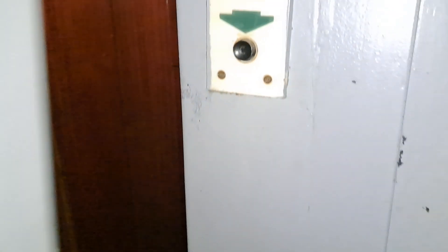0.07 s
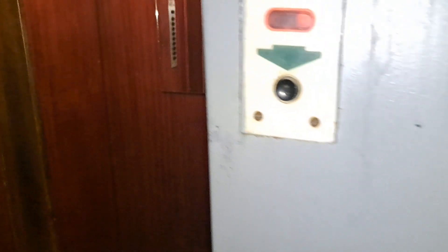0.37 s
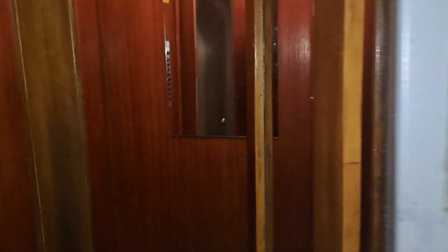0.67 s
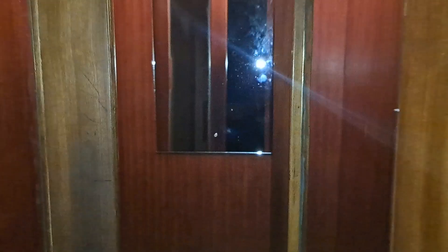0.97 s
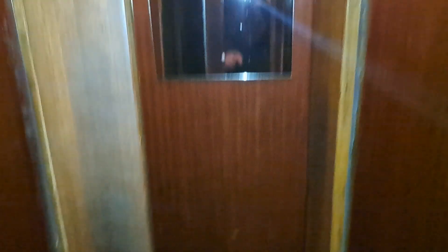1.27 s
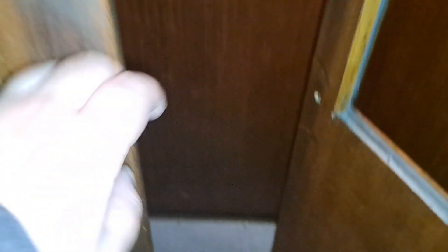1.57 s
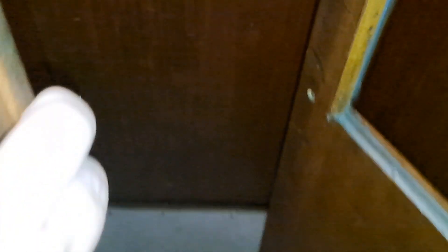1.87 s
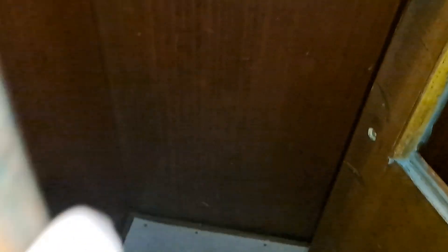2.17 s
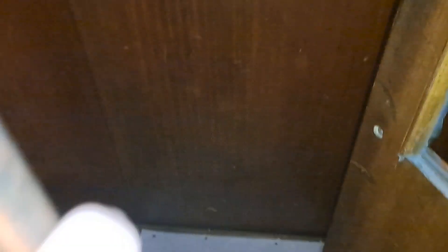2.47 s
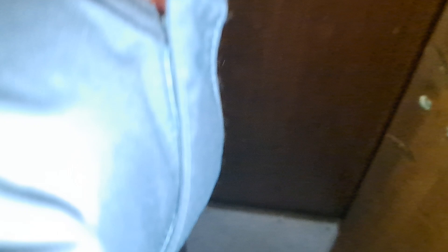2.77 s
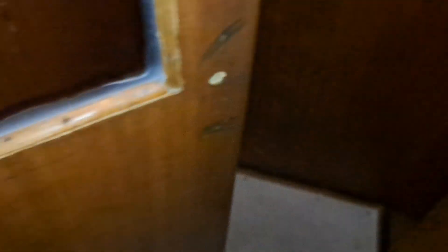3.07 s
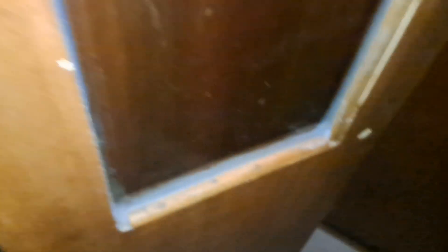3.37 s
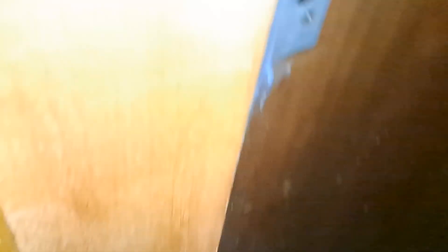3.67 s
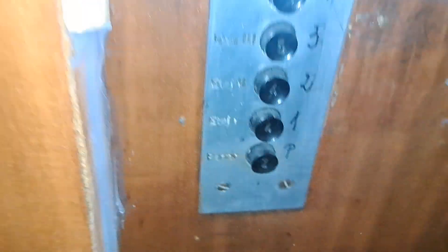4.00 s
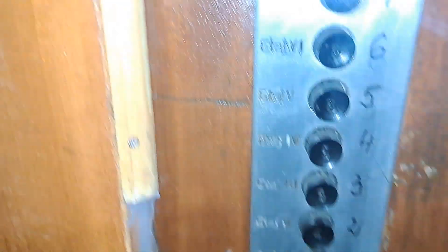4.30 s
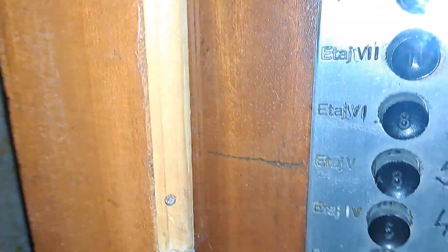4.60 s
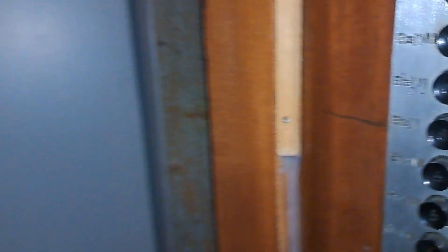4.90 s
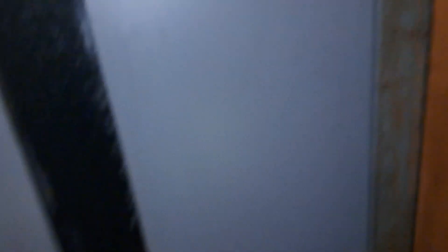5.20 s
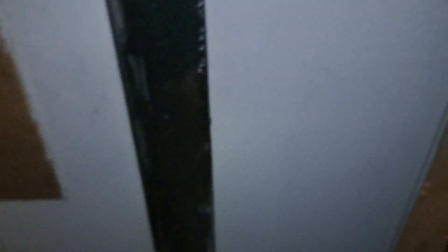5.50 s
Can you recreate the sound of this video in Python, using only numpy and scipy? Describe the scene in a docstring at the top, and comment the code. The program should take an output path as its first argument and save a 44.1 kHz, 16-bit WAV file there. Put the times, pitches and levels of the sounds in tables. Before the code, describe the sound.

A steel landing door booms softly with a few light knocks. Sleeves rustle close to the microphone, then the wooden doors of an old lift are pushed open with clunks, latch chinks and one brief metal squeak. After a lull they bump and shudder, closing with a loud cluster of clacks and a bright chink. The cabin rumbles low under the blows, and the stairwell adds a short echo.

```python
"""Stepping into an old wooden lift

A steel landing door booms, then wooden door leaves are pushed open with clacks and a short
squeal from the metal catch. They bump shut and shudder, and the loose latch chinks.
Sleeves rustle close by, the cabin drones, and the stairwell echoes the blows."""
import sys
import numpy as np
from scipy import signal
from scipy.fft import rfft, irfft, next_fast_len
from scipy.io import wavfile
from scipy.ndimage import uniform_filter1d

SR = 44100
rng = np.random.default_rng(int(sys.argv[2]) if len(sys.argv) > 2 else 0)


def output_pcm(signal):
    """Save a mono or channel-first signal as 16-bit PCM at the path in sys.argv[1].

    Samples are clipped to [-1, 1] before scaling.
    """
    pcm = np.clip(np.atleast_2d(signal).T, -1, 1) * 32767
    wavfile.write(sys.argv[1], SR, np.round(pcm).astype(np.int16))


N = 249165
TIME = np.arange(N) / SR

# hush of the building's still air: (frequency [Hz], relative level [dB])
AIR_COLOUR = [(15, -28), (25, 7), (64, 10), (120, -28), (229, 5), (677, -17), (734, -12), (2410, -7.5),
              (3250, -13.5), (5730, -26), (6920, -39), (13200, -22), (16000, -40)]
# how alike the two ears' noise is: (frequency [Hz], likeness [0 to 1])
EAR_LIKENESS = [(60, 0.88), (130, 1), (300, 0.84), (600, 0.55), (1200, 0), (16000, 0.12)]
# the stairwell's echo: (frequency [Hz], ring time [s]); a ring time is the time to fade by 60 dB
ECHO_TIMES = [(70, 0.55), (170, 1.27), (400, 1.15), (1000, 0.6), (2200, 0.84), (5000, 0.48), (12000, 0.67)]
# low rumbles from door pushes and one soft handling thump:
# (time [s], length [s], cabin air [dB], steel door [dB], wood [dB])
RUMBLES = [(-0.03, 0.18, -47, -27, -33.5), (0.372, .09, -60, -27.5, -39.5), (0.606, 0.15, -47, -34, -41),
           (1.29, 0.087, -55, -45.5, -49), (1.925, 0.3, -24.5, -34.5, -32.5),
           (2.63, 0.19, -31.5, -33.5, -45), (3.872, 0.13, -24, -41.5, -38), (4.144, 0.73, -31, -62, -45.5),
           (4.755, 0.05, -21.5, -40, -30.5), (5.209, 0.17, -17.5, -28.5, -21.5)]
# wooden leaves shuddering: (frequency [Hz], relative level [dB])
SHUDDER_COLOUR = [(30, -17), (110, -29), (190, 10), (330, 1), (480, -2), (800, -9), (1400, -68),
                  (3000, -44), (8000, -69)]
# sleeve strokes: (time of peak [s], level [dB], swell time [s], extra hiss [dB])
SLEEVE_STROKES = [(0, -39.5, 0.4, 0), (0.72, -42, 0.19, -2), (1.16, -45, 0.041, -1), (1.332, -35, .09, 2.5),
                  (1.438, -30.5, 0.099, 4.5), (1.75, -44, .12, 3.5), (2.1, -35.5, 0.1, -14),
                  (3.0, -43.5, 0.26, 4.5), (3.372, -46.5, 0.11, 7), (3.778, -41.5, 0.09, 10),
                  (4.07, -42.5, 0.26, 8.5), (4.72, -38, 0.033, -8), (4.88, -40.5, 0.1, 7),
                  (5.328, -27, 0.08, 6), (5.65, -44.5, 0.086, 11)]
# rubbing cloth: (frequency [Hz], relative level [dB])
CLOTH_COLOUR = [(150, -23), (250, -11), (460, -6.5), (760, -6), (845, -4), (940, -6.5), (1310, -8.5),
                (2320, -2), (2710, -3.5), (3170, -17), (5540, -17.5), (7060, -33.5), (13200, -24.5),
                (16000, -27)]
# chinks of the latch: (time [s], rattle level [dB], tick level [dB], rattle's ring time [s])
LATCH_CHINKS = [(0.058, -51, -32, .16), (0.343, -38, -31, 0.26), (1.887, -20, -50, 0.069),
                (2.197, -16, -21.5, .085), (2.482, -13, -58, 0.068), (5.127, -44, -27, 0.068),
                (5.171, -33, -44, .1), (5.214, -16.5, -16.5, 0.28), (5.300, -35, -44, 0.1)]
# where the latch rings: (frequency [Hz], width [Hz], relative level [dB])
LATCH_PEAKS = [(2040, 180, 0.5), (2350, 160, 0.5), (2800, 440, -8)]
# bright tick of steel on steel: (frequency [Hz], relative level [dB])
TICK_COLOUR = [(4000, -1), (6000, 5), (7600, -5.5), (11000, 8), (15500, -0.5)]
# slips of the catch: (time [s], length [s], start pitch [Hz], end pitch [Hz], level [dB])
SQUEALS = [(2.584, 0.028, 1330, 1470, -13), (2.606, 0.0268, 1700, 1880, -11.5),
           (2.610, 0.0322, 1550, 1430, -18), (2.578, 0.01, 2600, 2700, -16),
           (2.579, 0.023, 2070, 2030, -18), (2.614, 0.0275, 2200, 1900, -18),
           (2.584, 0.033, 2790, 2870, -19)]
# tones the catch rings on with: (frequency [Hz], relative level [dB], ring time [s])
CATCH_TONES = [(1400, 2, 0.33), (1420, 4, 0.41), (1481, -11, 0.45), (1510, -18, 0.69), (1670, -2, 1),
               (1900, -13, .7), (2100, -3, 0.24), (2150, 5, 0.55), (2720, -5, 0.3), (2850, -19, 0.5)]
# blows on doors and floor:
# (time [s], strength [dB], extra bass [dB], treble tilt [dB per octave], base rise [s], base ring [s])
BLOWS = [ (0.058, -34.5, -1, 2.05, 0.0013, 0.33), (0.176, -35, 1, 1.05, .002, 0.39),
         (0.343, -27, -8, 2, .0007, .37), (0.632, -34.5, -26, 1.2, 0.0055, 0.29),
         (1.572, -37.5, -21, 3.5, 0.00028, 0.015), (1.673, -40, -15, -0.5, .0003, 0.029),
         (1.749, -31, 9, -23, 0.01, 0.3), (1.879, -42.5, 19, 10.6, 0.0025, 0.1),
         (1.887, -22.5, 12, 2, 0.00035, 0.35), (1.940, -10, 3.5, -6, 0.014, .14),
         (2.031, -19, -2, -18, 0.0045, 0.82), (2.164, -26.5, -12, 1.5, 0.016, 0.51),
         (2.199, -21.5, 9.5, 5, 0.0014, 0.12), (2.216, -15, 2, -6, 0.00081, 0.2),
         (2.479, -28, 3.5, 2, 0.0018, 0.19), (2.549, -21.5, 4, -1.2, 0.01, 0.39),
         (2.585, -33, 12, 5.5, .0021, 0.23), (2.604, -36, 11, 6.5, .0031, 0.22),
         (2.645, -36.5, 0, 5.5, .0012, 0.12), (2.671, -21, 1, -8, 0.00098, 0.12),
         (3.210, -33, -25, -5.5, 0.00044, 0.033), (3.591, -49.5, 0, 2, .0005, 0.022),
         (3.692, -28, -2, -3, 0.00089, 0.13), (3.739, -32, -8, -1, 0.0079, 0.82),
         (3.783, -15, 6, -2, 0.0031, 0.29), (3.818, -14, 2.5, -2.5, 0.0041, .18),
         (4.282, -33, 13.5, -2, .009, 0.13), (4.356, -29, -2, -4.5, 0.0058, 0.2),
         (4.372, -14, -14, -8, 0.0025, 0.12), (4.395, -30.5, 17, -1, 0.0048, 0.14),
         (4.677, -24.5, -2, -7.5, 0.00076, .1), (4.756, -23.5, -20, -6.5, .011, 0.13),
         (4.776, -11, -13, -7, 0.0088, .15), (4.861, -30.5, -22, 1, .0004, 0.024),
         (4.927, -24.5, -16, -7, 0.00081, 0.1), (5.076, -2, -8, -8.5, 0.0037, 0.09),
         (5.127, -9.5, -11, -6.5, 0.0021, 0.15), (5.17, -31.5, 13, 3.5, 0.0028, 0.079),
         (5.214, -16.5, 6.5, -4, 0.005, 0.16), (5.246, -10.5, -11, -13, 0.0062, 0.27),
         (5.296, -47.5, 2, 7.5, 0.014, 0.72), (5.429, -52, 14, 6, .0036, 0.32),
         (5.599, -26, -18, -15, .002, 0.059)]
# low tones of the leaves and cabin: (frequency [Hz], relative level [dB], ring time [s])
DOOR_TONES = [(65.2, 10, 0.26), (101, -6.5, 0.55), (122.3, -9.5, 0.47), (178, -7.5, 0.31),
              (213.2, -5, 0.14), (255.3, -18.5, 0.63), (335.3, -10, 0.24), (409, -10.5, 0.26),
              (490, -17, 0.6), (577.5, -19, 0.077), (660.5, -11, 0.19), (835.5, -4.5, 0.1)]
# broad tone colour of the blows as the microphone hears them: (frequency [Hz], gain [dB])
BLOW_COLOUR = [(25, -13), (45, -11), (70, -5.5), (200, -2), (500, -3), (900, -6), (1400, -1.5), (2700, 0.5),
               (3400, -1), (5800, -2.5), (7600, -5.5), (11000, -4), (15500, 14)]
# narrow peaks and dips in the tone of the clacks: (frequency [Hz], gain [dB])
CLACK_RIPPLES = [(500, 0), (950, 4), (1410, -3), (2280, 3.5), (3170, -0.5), (4380, -4), (5900, -1.5)]
# which side the doors are on as the microphone turns: (time [s], left minus right [dB])
DOOR_SIDE = [(0.3, 1.5), (1.9, 1), (2.6, 0.5), (3.8, -1.5), (4.7, -1.5), (5.1, -0.5), (5.3, 2.5)]
# tone colour of the microphone's two openings: (frequency [Hz], left minus right [dB])
MIC_BALANCE = [(60, -3), (150, 0.5), (330, -3), (600, -1), (1100, -2.5), (2000, -9), (2900, -9.5),
               (4000, 4), (5600, 3), (7500, 9), (9500, 20.5), (12000, 7), (16000, -17)]

BOOM_HZ, KNOCK_HZ, CLACK_HZ, SNAP_HZ = 65, 330, 2000, 4500  # parts of a blow on wood, low to high


def gain_of(db):
    """Turns decibels into a number to multiply by."""
    return 10 ** (np.asarray(db) / 20)


def evened(x):
    """Scales a signal to an average (rms) level of 1."""
    return x / np.sqrt(np.mean(x ** 2) + 1e-20)


def read(table, hz):
    """Reads between a table's rows on a musical (log) frequency scale."""
    f, value = np.transpose(table)
    return np.interp(np.log(hz + 1), np.log(f), value)


def dying(t, ring_s):
    """A fade that falls by 60 dB every ring_s seconds."""
    return np.exp(-np.log(1000) * t / ring_s)


def wobble(shape, samples):
    """A random wiggle, smoothed over some samples."""
    return evened(uniform_filter1d(rng.standard_normal(shape), size=samples))


def add(mix, start_s, sound):
    """Adds a stereo sound into the mix."""
    part = mix[:, max(round(start_s * SR), 0):][:, :sound.shape[-1]]
    part += sound[..., :part.shape[1]]


def coloured(x, db_at):
    """Turns each frequency up or down by db_at(frequency)."""
    size = next_fast_len(x.shape[-1] + 4096, True)
    gain = gain_of(db_at(np.fft.rfftfreq(size, 1 / SR)))
    return irfft(rfft(x, size) * gain, size)[..., :x.shape[-1]]


def noise(db_at):
    """Stereo noise of a given colour, alike in both ears only in the bass."""
    size = next_fast_len(N, True)
    hz = np.fft.rfftfreq(size, 1 / SR)
    left, other = rng.standard_normal((2, len(hz))) + 1j * rng.standard_normal((2, len(hz)))
    alike = read(EAR_LIKENESS, hz)
    right = alike * left + np.sqrt(1 - alike ** 2) * other
    return evened(irfft(np.array([left, right]) * gain_of(db_at(hz)), size)[:, :N])


def ringing_noise(hz, width_hz):
    """Noise gathered around one pitch."""
    return noise(lambda f: -20 * np.log10(1 + (2 * (f - hz) / width_hz) ** 2))


def still_air(level_db=-51.5):
    """The steady hush of the building."""
    return gain_of(level_db) * noise(lambda f: read(AIR_COLOUR, f))


def stairwell(sound, build_s=0.0083):
    """A smooth echo in which each frequency fades at its own speed."""
    hz, t, bands = signal.stft(rng.standard_normal((2, SR)), SR, nperseg=256)
    tail = signal.istft(bands * dying(t, read(ECHO_TIMES, hz)[:, None]), SR, nperseg=256)[1]
    tail *= 1 - np.exp(-np.arange(tail.shape[1]) / SR / build_s)
    middle, side = signal.fftconvolve(sound, tail / np.linalg.norm(tail[0]), axes=1)[:, :N]
    share_db = lambda f, sign: 10 * np.log10(np.clip((1 + sign * read(EAR_LIKENESS, f)) / 2, 1e-4, 1))
    middle = coloured(middle, lambda f: share_db(f, 1.0))
    side = coloured(side, lambda f: share_db(f, -1.06))
    return np.array([middle + side, middle - side])


def shaken(levels_db, ring_s, rise_s=0.03):
    """How hard one part shakes: it builds up, holds during each rumble, then fades."""
    power = np.zeros(N)
    for (start_s, length_s, *_), db in zip(RUMBLES, levels_db):
        t = TIME[TIME > start_s] - start_s
        level = gain_of(db) * (1 - np.exp(-t / rise_s)) * dying(np.maximum(t - length_s, 0), ring_s)
        power[N - len(t):] += level ** 2
    return np.sqrt(power)


def cabin_drone(chatter_db=2):
    """Swinging doors shake the cabin air and the steel sheet; the leaves shudder on their hinges."""
    cabin_db, steel_db, wood_db = np.transpose(RUMBLES)[2:]
    chatter = evened(gain_of(chatter_db * wobble(N, 500)))
    sheet = ringing_noise(141.5, width_hz=32) + gain_of(-17) * ringing_noise(858, width_hz=280)
    steel = shaken(steel_db, ring_s=1.37) * sheet
    cabin = shaken(cabin_db, ring_s=1) * ringing_noise(67.4, width_hz=23)
    wood = shaken(wood_db, ring_s=0.87) * chatter * noise(lambda f: read(SHUDDER_COLOUR, f))
    return cabin + steel + wood


def sleeves(grain_db=2, hiss_hz=8000, fade_share=0.88):
    """Cloth rubs in small uneven catches; each stroke swells and fades, and close ones hiss more."""
    level, hiss = np.zeros((2, N))
    for peak_s, db, swell_s, hiss_db in SLEEVE_STROKES:
        slope_s = swell_s * np.where(TIME < peak_s, 1, fade_share)
        stroke = gain_of(db) * np.exp(-abs(TIME - peak_s) / slope_s)
        level = np.hypot(level, stroke)
        hiss = np.hypot(hiss, gain_of(hiss_db) * stroke)
    rub = noise(lambda f: read(CLOTH_COLOUR, f))
    treble = coloured(rub, lambda f: -20 * np.log10(1 + (hiss_hz / (f + 1)) ** 4))
    grain = gain_of(grain_db * wobble(N, 180))
    return grain * (level * (rub - treble) + hiss * treble)


def latch(rise_s=0.0066, tick_ring_s=0.066):
    """The loose steel tongue ticks and rattles briefly at a few pitches."""
    rattle = evened(sum(gain_of(db) * ringing_noise(hz, width) for hz, width, db in LATCH_PEAKS))
    rattle_level, tick_level = np.zeros((2, 2, N))
    t = np.arange(SR // 2) / SR
    rise = 1 - np.exp(-t / rise_s)
    for start_s, rattle_db, tick_db, ring_s in LATCH_CHINKS:
        add(rattle_level, start_s, gain_of(rattle_db) * rise * dying(t, ring_s))
        add(tick_level, start_s, gain_of(tick_db) * rise * dying(t, tick_ring_s))
    return rattle_level * rattle + tick_level * noise(lambda f: read(TICK_COLOUR, f))


def squealing_catch(roughness=0.03, muffle_hz=6000, ring_start_s=2.61):
    """Metal sticks and slips in rough sliding tones with weak overtones, then rings on."""
    out = np.zeros((2, N))
    for start_s, length_s, start_hz, end_hz, db in SQUEALS:
        size = int(length_s * SR)
        waver = 1 + roughness * wobble((2, SR // 8), 30)[:, :size]
        pitch_hz = np.linspace(start_hz, end_hz, size) * waver
        cycles = np.cumsum(pitch_hz, 1) / SR + rng.random((2, 1))
        tone = 0
        for harmonic, harmonic_db in enumerate([0, -15, -21], 1):
            muffle = 1 + (harmonic * start_hz / muffle_hz) ** 12
            tone += gain_of(harmonic_db) / muffle * np.sin(2 * np.pi * harmonic * cycles)
        add(out, start_s, gain_of(db) * np.sqrt(2) * signal.windows.tukey(size, 0.7) * tone)
    t = np.arange(SR) / SR
    ring = sum(gain_of(db) * dying(t, ring_s) * np.sin(2 * np.pi * (hz * t + rng.random((2, 1))))
               for hz, db, ring_s in CATCH_TONES)
    add(out, ring_start_s, gain_of(-35) * (1 - np.exp(-t / 0.0055)) * ring)
    return out


def blow_colour_db(f, sharpness=20):
    """The blows' broad colour as the microphone hears it, with narrow peaks and dips on top."""
    ripples = sum(db / (1 + (2 * sharpness * (f / hz - 1)) ** 2) for hz, db in CLACK_RIPPLES)
    return read(BLOW_COLOUR, f) + ripples - 2


def blow_db(hz, strength_db, bass_db, tilt_db):
    """A heavy blow booms, a hard one is bright, and the wood dulls the highest notes."""
    octaves = lambda low, high: np.log2(np.clip(hz, low, high) / low)
    bass = np.maximum(1 - octaves(BOOM_HZ, KNOCK_HZ) / np.log2(KNOCK_HZ / BOOM_HZ), 0) ** 0.94
    dull_db = 10 * octaves(CLACK_HZ, SNAP_HZ) + 18 * octaves(SNAP_HZ, SR)
    return strength_db + bass_db * bass + tilt_db * octaves(KNOCK_HZ, SNAP_HZ) - dull_db


def door_blows(boom_rise_s=0.017, crack_s=0.0018, close_tap_s=0.052):
    """Blows crack and set the panels ringing. Returns the direct sound and the part that will echo."""
    direct, to_echo = np.zeros((2, 2, N))
    t = np.arange(SR // 2) / SR
    bands_hz = 62.5 * 2. ** np.arange(9)
    # the panels ring at so many pitches that each octave is a band of noise
    panels = np.array([noise(lambda f: -48 * np.log2((f + 1) / hz) ** 4) for hz in bands_hz], np.float32)
    end_fade = np.minimum((t[-1] - t) * 10, 1)
    # the cabin's boom needs time to build; the knock is there at once
    swell = lambda hz, rise_s: 1 - np.exp(-t / (rise_s + boom_rise_s * (BOOM_HZ / hz) ** 2))
    # wood holds the bass longer and damps the treble sooner
    ring_scale = (CLACK_HZ / bands_hz) ** np.where(bands_hz < CLACK_HZ, 0.21, 0.22)
    tones = np.array([gain_of(db) * swell(hz, 0) * dying(t, ring_s) * np.sin(2 * np.pi * hz * t)
                      for hz, db, ring_s in DOOR_TONES])
    crack = gain_of(2) * np.exp(-t / crack_s)
    for start_s, *force, rise_s, ring_s in BLOWS:
        levels_db = blow_db(bands_hz, *force)
        shapes = np.array([gain_of(db) * swell(hz, rise_s) * (dying(t, ring_s * scale) + crack)
                           for hz, db, scale in zip(bands_hz, levels_db, ring_scale)])
        offset = int(rng.random() * (N - len(t)))
        clack = np.sum(shapes[:, None] * panels[:, :, offset:offset + len(t)], axis=0)
        ring = gain_of(blow_db(np.transpose(DOOR_TONES)[0], *force)) @ tones
        sound = end_fade * (clack + np.sqrt(2) * ring)
        add(direct, start_s, sound)
        # faint blows are far off and get more echo; very short taps are close and get less
        echo_share = min(ring_s / close_tap_s, 1) * gain_of(-16 - 0.3307 * levels_db.max())
        add(to_echo, start_s, echo_share * sound)
    return coloured(direct, blow_colour_db), coloured(to_echo, blow_colour_db)


def scene(metal_echo_db=-11):
    """Doors, metal fittings and sleeves over the still air of the building."""
    doors, doors_to_echo = door_blows()
    doors *= gain_of(np.array([[0.5], [-0.5]]) * np.interp(TIME, *np.transpose(DOOR_SIDE)))
    metal = squealing_catch() + latch()
    air = still_air()
    echo = stairwell(doors_to_echo + gain_of(metal_echo_db) * metal)
    return air + echo + sleeves() + cabin_drone() + metal + doors


def record(dry, top_hz=15950):
    """The microphone colours each side, rounds off loud peaks and cuts the highest treble."""
    def sides_db(f):
        lean = read(MIC_BALANCE, f)
        return np.array([lean, -lean]) / 2 - 10 * np.log10((gain_of(lean) + gain_of(-lean)) / 2)
    heard = coloured(dry, sides_db)
    rounded = heard / (1 + heard ** 8) ** (1 / 8)
    treble_cut = signal.firwin(511, top_hz, window=("kaiser", 9), fs=SR)
    return signal.oaconvolve(rounded, treble_cut[None], "same")


dry = scene()
out = record(dry)
output_pcm(out)
```